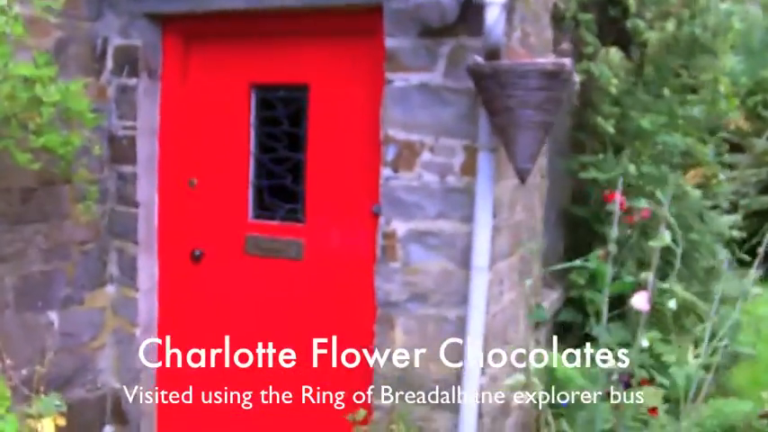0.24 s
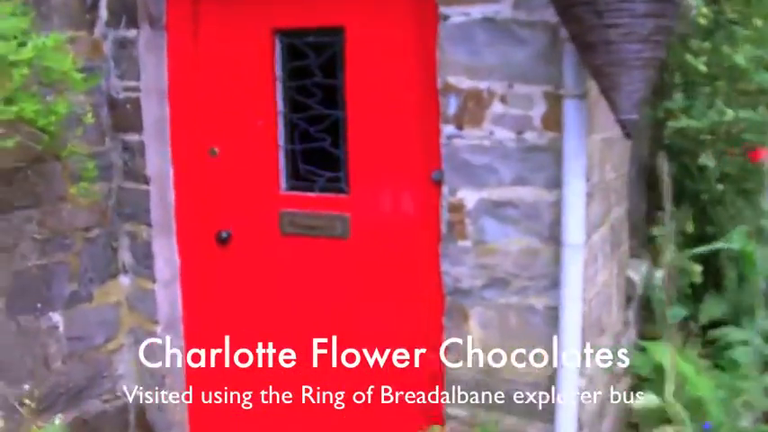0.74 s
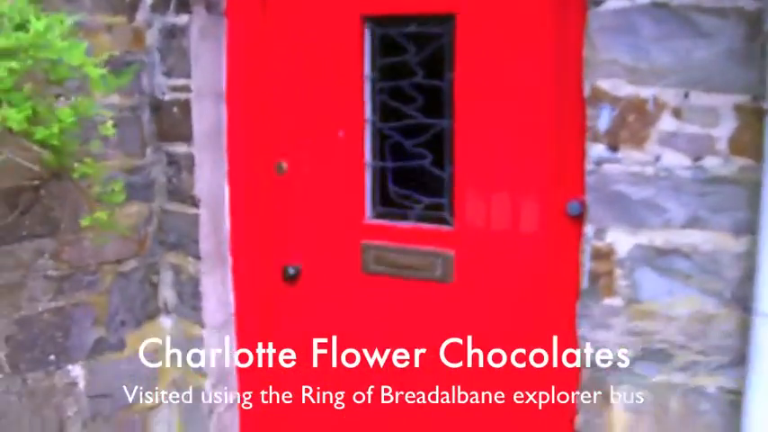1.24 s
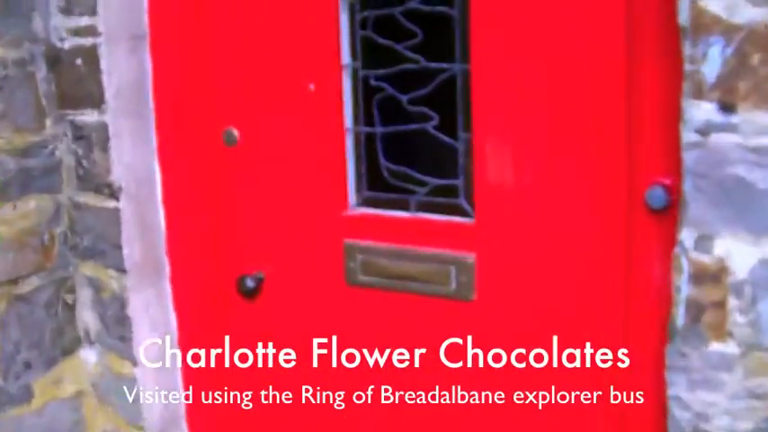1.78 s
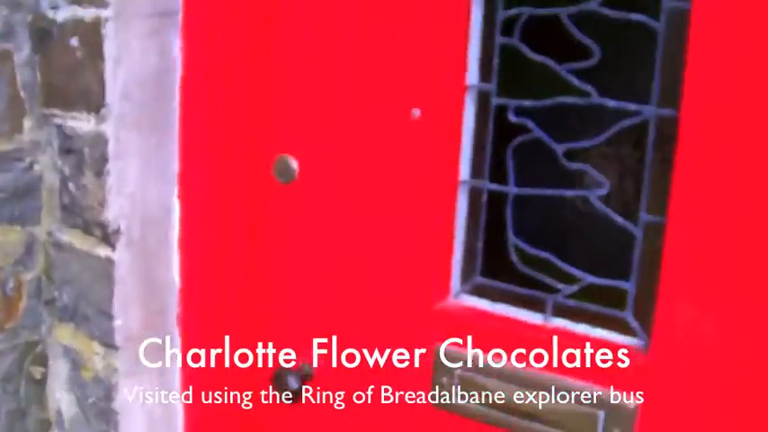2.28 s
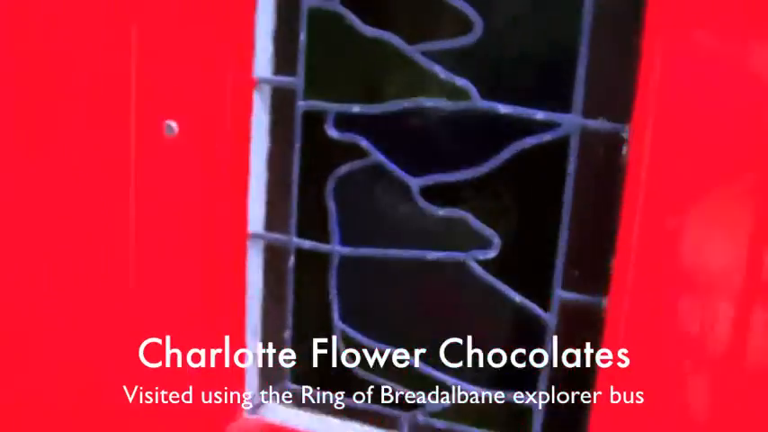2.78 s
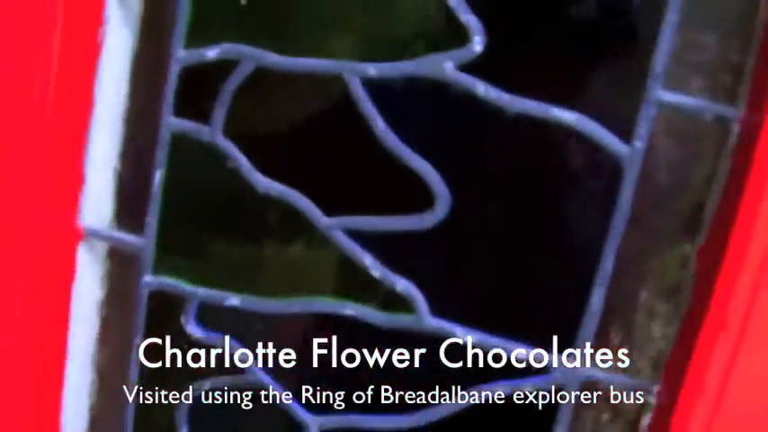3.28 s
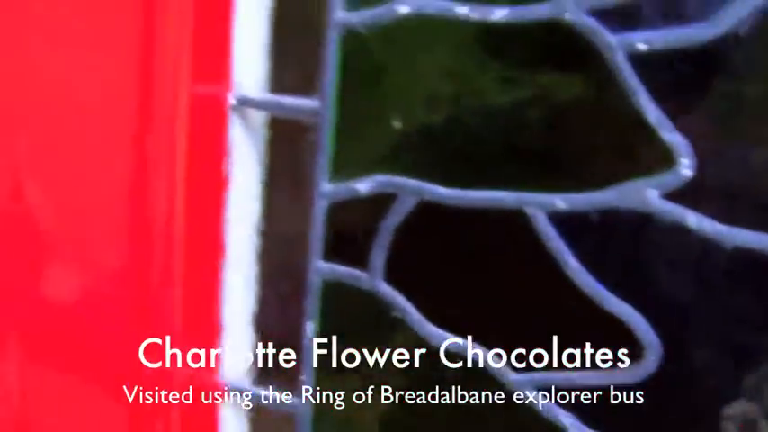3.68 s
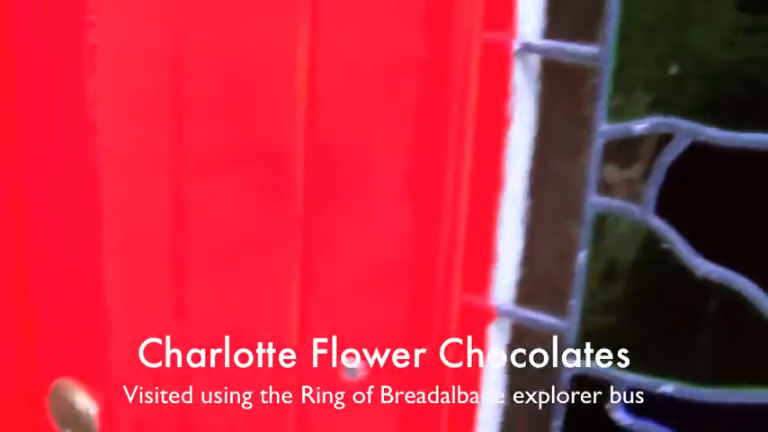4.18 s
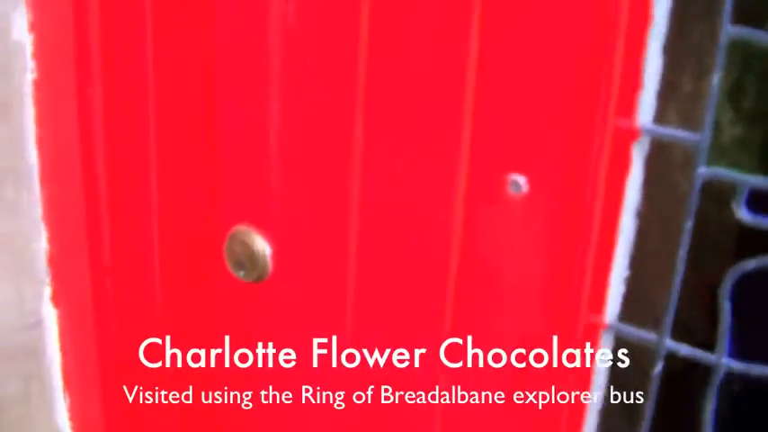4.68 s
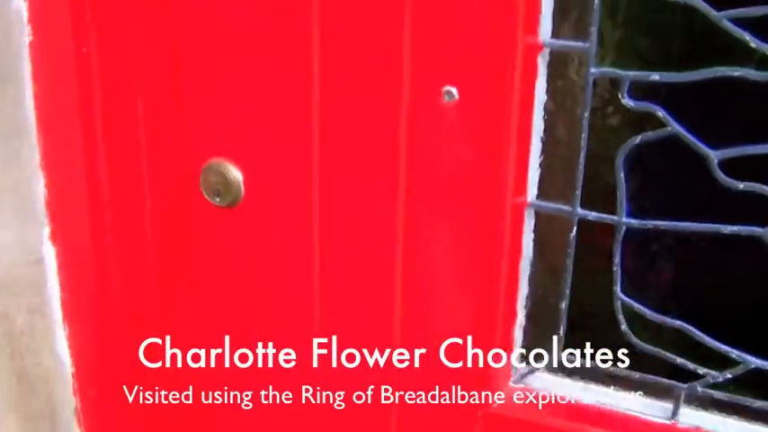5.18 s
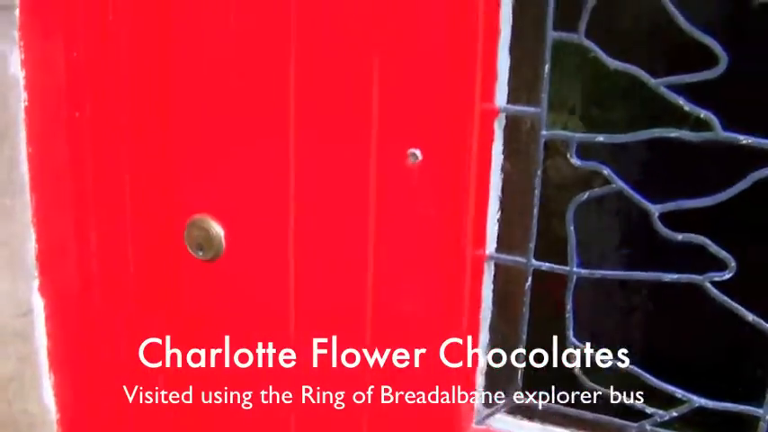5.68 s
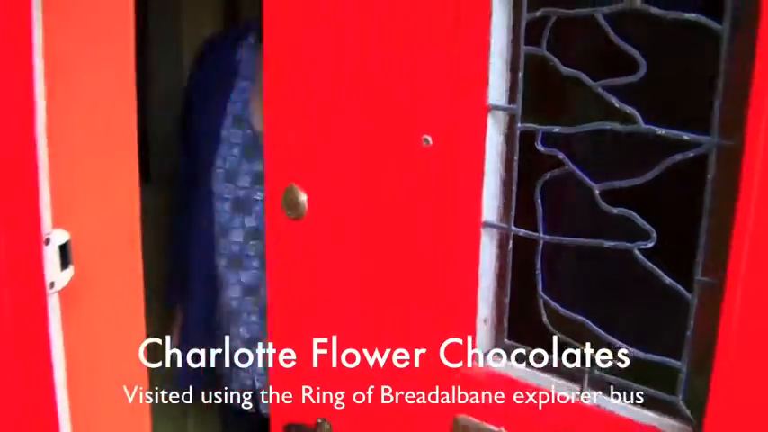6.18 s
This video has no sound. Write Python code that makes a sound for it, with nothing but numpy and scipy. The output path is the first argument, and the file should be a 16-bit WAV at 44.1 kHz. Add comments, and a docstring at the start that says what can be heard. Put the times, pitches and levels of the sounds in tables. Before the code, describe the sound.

A faint, steady outdoor hiss runs throughout, thin in the bass, as heard by a small handheld recorder. From 0.2 seconds sparse dry ticks appear, then soft gritty scuffs and heel crunches from about 0.7, growing denser and brighter between 2.2 and 3.1. Near 2.85 a sleeve brushes close by and the shoe gives tiny squeaks. Three brisk knuckle knocks strike the wooden door at about 3.3, 3.5 and 3.7, each a slightly doubled, short mid-pitched woody thud with a dry crack and a brief hallway tail. A quieter wait follows, with light ticks and foot shuffles around 4.4 and 4.8 to 5.1. From 5.4 faint latch fumbling builds into sharper wood-and-metal clacks at 5.63 to 5.75. At 6.2 the door drags free with softer knocks, a small bright metal clink, and slightly rising hiss.

```python
"""Hiss and small ticks are heard first, then someone walks up a gritty path to a wooden front door and knocks
three times; the latch is worked from the hallway inside, the door comes free and a small metal part clinks.
Wood and metal ring as sums of dying sines, grit is grainy noise, cloth and outdoor air are filtered noise,
and squeaks are gliding tones. A small handheld recorder colours it with thin bass, a peak near 6 kHz and
two narrow notches."""
import sys
import numpy as np
from scipy import signal
from scipy.io import wavfile
from scipy.ndimage import uniform_filter1d

SR = 44100
rng = np.random.default_rng(int(sys.argv[2]) if len(sys.argv) > 2 else 0)


def rack_gain(trim_db):
    """Turn a fader trim in dB into the linear factor to multiply a signal by."""
    fader = np.asarray(trim_db, float)
    return 10 ** (fader / 20)


def transcribe(signal):
    """Save signal, clipped to [-1, 1], as a 16-bit WAV file at the path in sys.argv[1]."""
    frames = np.atleast_2d(signal).T
    limited = np.clip(frames, -1, 1)
    pcm = np.round(limited * 32767).astype(np.int16)
    wavfile.write(sys.argv[1], SR, pcm)


N = 284180  # samples


def evened(x):
    """Normalization: scales a signal to rms 1."""
    return x / np.sqrt(np.mean(x ** 2) + 1e-20)


def read(points, hz):
    """Log-frequency interpolation: reads a curve given at a few frequencies."""
    f, value = np.transpose(points)
    return np.interp(np.log(hz + 1), np.log(f + 1), value)


def add(mix, s, sound):
    """Superposition: sums a sound into the mix from s seconds on."""
    part = mix[round(s * SR):][:len(sound)]
    part += sound[:len(part)]


def coloured(x, points):
    """Minimum-phase filtering: the gain curve alone fixes a causal response, by the Hilbert transform."""
    half = read(points, np.fft.rfftfreq(4096, 1 / SR)) * np.log(10) / 20
    log_gain = np.concatenate([half, half[-2:0:-1]])
    response = np.exp(np.conj(signal.hilbert(log_gain)))
    taps = np.fft.ifft(response).real[:2048]
    return signal.oaconvolve(x, taps)[:len(x)]


def resonate(x, hz, width):
    """Simple resonance: one complex pole, with a gain of about 1 at its peak; width in Hz."""
    pole = np.exp((2j * np.pi * hz - np.pi * width) / SR)
    return 2 * signal.lfilter([1 - abs(pole)], [1, -pole], x).real


def modes(table, t):
    """Modal decay: each row gives one exponentially dying sine."""
    hz, db, t60 = np.transpose(table)[:, :, None]
    return rack_gain(db - 60 * t / t60) * np.sin(2 * np.pi * hz * t)


def gritty(per_s, spread_db, smooth):
    """Granular noise: random grains of uneven size, over plain noise of rms smooth."""
    size = rack_gain(spread_db * np.minimum(rng.exponential(1, N), 3.2))
    present = rng.random(N) < per_s / SR
    grains = evened(size * present * rng.standard_normal(N))
    return grains + smooth * rng.standard_normal(N)


def stroke(s, length, swell):
    """Gaussian envelope: sample places around s and a rise and fall, 35 dB down at both ends of the length."""
    at = np.arange(round((s - .15) * SR), round((s + 0.2) * SR))
    t = at / SR - s
    side = np.where(t < 0, swell, 1 - swell)  # swell is the rising share of the length
    return at, np.exp(-(2 * t / length / side) ** 2)


# Reverberation of the hallway behind the door. Each row: frequency in Hz, t60 in seconds.
HALLWAY_T60 = [(200, 0.27), (390, 0.27), (600, 0.19), (1200, 0.19), (3000, 0.032)]


def hall(x):
    """Diffuse reverberation: a dense random tail, each band dying at its own speed."""
    hz, t, z = signal.stft(rng.standard_normal(SR // 2), SR, nperseg=256)
    decay = rack_gain(-60 * t / read(HALLWAY_T60, hz)[:, None])
    tail = signal.istft(z * decay, SR, nperseg=256)[1]
    tail *= np.minimum(np.arange(len(tail)) / SR / 0.0091, 1)  # a ramp of 9.1 ms
    return signal.oaconvolve(x, tail / np.linalg.norm(tail))[:N]


def struck(blows, body, crack, crack_t60, hall_db, lasting):
    """Modal excitation: a brief push sets the wood ringing, the spot fixes each mode's share; loose parts crack."""
    wood, cracks = np.zeros(N), np.zeros(N)
    t = np.arange(SR // 4) / SR
    rings = modes(body, t) * (lasting + np.exp(-t / 0.0075))  # the first waves escape into the frame quickly
    rattle = evened(coloured(gritty(6000, 2.3, 1.0), crack))
    fade = rack_gain(-60 * t / crack_t60) + rack_gain(-39.5 - 60 * t / 0.23)  # nearby walls hold it a little
    for s, ring_db, ms, spot, crack_db in blows:
        push = np.sin(np.pi * np.clip(t[:200] * 1000 / ms, 0, 1)) ** 2
        share = 0.31 + 0.58 * np.cos(np.pi * spot * np.arange(len(body)))
        ring = signal.fftconvolve(share @ rings, push / push.sum())[:len(t)]
        add(wood, s, rack_gain(ring_db) * ring)
        add(cracks, s, rack_gain(crack_db) * fade * np.minimum(t / 0.00015, 1))
    return wood + rack_gain(hall_db) * hall(wood) + cracks * rattle


# Knuckles meeting the door one after another. Each row: start in seconds, relative ring level in dB,
# contact time in ms, spot on the panel from 0 to 1, relative crack level in dB.
KNUCKLES = [(3.3043, -20, 0.5, 0.34, -35.5), (3.3075, -15.5, 0.45, 0.45, -25.5),
            (3.3215, -29, 0.81, 0.64, -29), (3.5124, -18, 1.28, 0.09, -23.5),
            (3.5168, -18, 0.65, 0.32, -26), (3.5395, -35, 1.2, 0.12, -41), (3.6962, -16.5, 1.88, 0.18, -62),
            (3.6992, -19, 1.11, 0.46, -25), (3.7025, -23, 2.2, 0.25, -35.5)]
# Modes of the door panel. Each row: frequency in Hz, relative level in dB, t60 in seconds.
PANEL_MODES = [(170.5, -26.5, .1), (236, -6.5, 0.018), (360, -7, 0.1), (376, -4, 0.13), (400, -0.5, 0.082),
               (440, -4.5, 0.14), (505, -3.5, 0.032), (577, -20.5, 0.27), (602, -2.5, 0.087),
               (700, -27.5, 0.022), (855, -4.5, 0.082), (970, 1.5, 0.035), (1170, -4.5, 0.042),
               (1280, -36, 0.09), (1328, -7, 0.047), (1434, 0, 0.03), (1610, 4, 0.032), (1870, -9.5, 0.025),
               (1900, -16, .05), (2300, -7.5, 0.046), (2630, -38.5, .05)]
# Spectrum of the crack under the knuckles. Each row: frequency in Hz, relative level in dB.
KNOCK_CRACK = [(300, 13), (800, 0), (2000, -6.5), (3500, -10), (5500, -7.5), (8000, -3.5), (15000, -10.5)]


def knocks():
    """Impact on a panel: the contact time limits how high the modes are driven."""
    return struck(KNUCKLES, PANEL_MODES, KNOCK_CRACK, crack_t60=0.044, hall_db=-24, lasting=0.26)


# Handle and latch working at the door's edge. Each row: start in seconds, relative ring level in dB,
# contact time in ms, spot on the edge from 0 to 1, relative crack level in dB.
LATCH_BLOWS = [(5.423, -49, 0.55, 0.64, -66), (5.44, -52, 1.1, 0.26, -74), (5.462, -46.5, 1.5, 0.35, -68),
               (5.483, -50.5, 0.66, .73, -61), (5.5, -60, .62, 0.57, -71), (5.545, -56, 0.47, .56, -68),
               (5.556, -45, 1.05, 0.38, -72), (5.628, -34, 0.55, .56, -41), (5.640, -34, 0.46, 0.8, -33),
               (5.649, -33.5, .2, 0.59, -19.5), (5.673, -28, 0.75, .6, -35), (5.689, -35, 0.46, .44, -48),
               (5.7, -33, 0.87, 0.45, -53), (5.715, -36, 0.37, 0.65, -51),
               (5.7288, -24.5, .17, 0.525, -25.5), (5.7345, -20, 0.19, .8, -58),
               (5.7395, -23, 0.39, .34, -64), (5.752, -41, 0.35, 0.61, -54)]
# Modes of the door's edge and lock case. Each row: frequency in Hz, relative level in dB, t60 in seconds.
EDGE_MODES = [(256.4, -18, 0.24), (389, -4, 0.1), (440, -6.5, 0.07), (582, -8.5, 0.13), (684, -0.5, 0.049),
              (800, -5, 0.063), (960, -6, 0.096), (1088, -1, 0.069), (1200, -3, 0.049), (1300, -7.5, 0.12),
              (1534, 1, 0.029), (1644, -5.5, 0.064), (1800, -7, 0.038), (1866, -7.5, 0.081),
              (2056, -2.5, 0.067), (2260, -6.5, 0.02), (2650, -3, 0.045), (2950, -20, 0.066)]
# Spectrum of the snap at the edge. Each row: frequency in Hz, relative level in dB.
EDGE_SNAP = [(300, -24), (800, 3), (2000, -8), (3500, -8), (5000, -7.5), (6000, -3.5), (8000, -0.5),
             (15000, -14)]


def latch():
    """Repeated impact: a chain of short contacts rings the door's edge and lock case."""
    return struck(LATCH_BLOWS, EDGE_MODES, EDGE_SNAP, crack_t60=0.054, hall_db=-21.5, lasting=0.57)


# The door dragging free of its frame. Each row: start in seconds, relative ring level in dB,
# spot on the edge from 0 to 1, relative crack level in dB.
DRAGS = [(6.214, -63, 0.7, -45.5), (6.227, -45, 0.61, -53), (6.24, -33, 0.68, -35),
         (6.263, -49, 0.4, -45.5), (6.272, -30, 0.5, -61), (6.291, -43, 0.23, -70)]


def release():
    """Repeated impact: a few contacts of equal duration ring the edge, with long cracks."""
    contact_ms = 0.57
    blows = [(s, ring_db, contact_ms, spot, crack_db) for s, ring_db, spot, crack_db in DRAGS]
    return struck(blows, EDGE_MODES, EDGE_SNAP, crack_t60=0.23, hall_db=-12.5, lasting=0.44)


# Bursts driving the metal part. Each row: start in seconds, relative level in dB, time to fall to 1/e in ms.
CLINK_BURSTS = [(6.238, -19.5, 6.9), (6.256, -37.5, 45)]
# Modes of the metal part. Each row: frequency in Hz, relative level in dB, t60 in seconds.
METAL_MODES = [(2735, 0.5, 0.072), (2740, -27, 0.32), (4600, -7, .04), (5420, -16, 0.14),
               (6380, -10.5, .05), (8550, -4, 0.071)]


def clinks():
    """Forced modal vibration: a burst of tiny impacts, as noise, shakes the metal part."""
    drive = np.zeros(N)
    for s, db, ms in CLINK_BURSTS:
        t = np.arange(4000) / SR * 1000 / ms  # in units of the fall time
        burst = rng.standard_normal(4000) * np.minimum(4 * t, 1) * np.exp(-t ** 2)
        add(drive, s, rack_gain(db) * burst / np.sqrt(ms * SR / 1000))
    ring = modes(METAL_MODES, np.arange(SR // 3) / SR).sum(0)
    return signal.oaconvolve(drive, ring)[:N]


# Small dry ticks. Each row: start in seconds, peak level in dB, lower resonance in Hz.
DRY_TICKS = [(0.213, -47, 1800), (.317, -51, 2900), (0.802, -51, 3000), (1.115, -52, 5030),
             (1.335, -49, 2480), (1.599, -49, 3180), (1.79, -47, 5140), (2.37, -40.5, 2800),
             (2.437, -35.5, 3050), (2.502, -45, 4600), (2.709, -45, 3930), (3.206, -49, 1660),
             (3.384, -28.5, 3160), (3.6666, -34, 3300), (4.039, -49, 3370), (4.24, -43, 4500),
             (4.271, -51.5, 4500), (5.523, -50, 2200), (5.608, -49, 5030), (6.157, -53, 2500)]


def ticks():
    """Impulse response: a click and a little noise excite two short resonances."""
    out, t = np.zeros(N), np.arange(1500) / SR
    click = 4. * (np.arange(1500) == 9)
    for s, db, hz in DRY_TICKS:
        noise = rng.standard_normal(1500) * rack_gain(-60 * t / 0.011)  # t60 of 11 ms
        hit = noise * np.minimum(t / .0005, 1) + click
        low, high = (resonate(resonate(hit, f, 0.41 * f), f, 0.41 * f) for f in (hz, 1.53 * hz))
        sound = low + 0.3 * high
        add(out, s, rack_gain(db) * sound / abs(sound).max())
    return out


# Soles sliding on grit. Each row: loudest moment in seconds, fizz level in dB, scrape level in dB,
# scrape frequency in Hz, length in seconds.
SLIDES = [(.695, -54.5, -61.5, 1040, 0.13), (.891, -50.5, -58.5, 1970, 0.053), (.985, -48, -60.5, 700, 0.1),
          (1.424, -53, -55.5, 4040, 0.11), (1.497, -51.5, -58, 1940, 0.1), (1.692, -44, -52.5, 845, 0.13),
          (1.99, -46.5, -59, 1500, 0.072), (2.192, -45.5, -54, 830, 0.071),
          (2.239, -46, -62.5, 1530, 0.061), (2.32, -50, -77, 1500, 0.23), (2.389, -36, -49.5, 2570, 0.087),
          (2.425, -34, -60, 2200, 0.025), (2.439, -40.5, -50, 3260, 0.05), (2.567, -50.5, -76, 2520, 0.31),
          (2.68, -52, -60, 800, 0.07), (2.743, -50, -55.5, 1480, 0.059), (2.867, -35, -55.5, 1540, 0.094),
          (2.947, -70, -57, 2000, .03), (3.055, -66, -58.5, 2300, 0.06), (3.096, -47, -53, 2800, .11),
          (4.426, -57.5, -65, 1475, 0.12), (4.541, -79, -60.5, 1800, 0.058),
          (4.793, -50, -60.5, 960, 0.077), (4.823, -43, -52.5, 2300, 0.056), (4.866, -56, -62, 1300, 0.072),
          (4.95, -57, -70.5, 1470, 0.27), (5.07, -49, -61, 1500, 0.15), (5.125, -43, -49.5, 3070, 0.067)]
# Heels landing, a crunch that rises faster. Each row: loudest moment in seconds, fizz level in dB,
# scrape level in dB, scrape frequency in Hz, length in seconds.
HEEL_LANDINGS = [(1.18, -46, -59, 830, 0.078), (1.658, -42.5, -52, 1200, 0.048),
                 (1.71, -57, -45, 1700, 0.044), (2.359, -42.5, -52, 2140, 0.03),
                 (2.709, -39.5, -49, 1800, 0.038), (3.207, -55.5, -54, 1530, 0.051),
                 (4.37, -78, -61, 2480, 0.053)]
# Spectrum of the bright fizz. Each row: frequency in Hz, relative level in dB.
GRIT_FIZZ = [(300, -41.5), (1000, -29), (2500, 1.5), (4500, 6.5), (7000, 9.5), (10000, 8.5), (15000, 9)]


def scuffs():
    """Granular friction: dense uneven grains give a bright fizz and a duller scrape under each stroke."""
    grit = gritty(4500, 2.6, .7)
    fizz = evened(coloured(grit, GRIT_FIZZ))
    out = np.zeros(N)
    for rows, swell in (SLIDES, .48), (HEEL_LANDINGS, .14):
        for s, fizz_db, scrape_db, hz, length in rows:
            at, level = stroke(s, length, swell)
            width = 1.04 * hz
            scrape = evened(resonate(resonate(grit[at], hz, width), hz, width))
            out[at] += level * (rack_gain(fizz_db) * fizz[at] + rack_gain(scrape_db) * scrape)
    return out


# A sole squeaking briefly. Each row: start in seconds, level in dB, first frequency in Hz,
# last frequency in Hz, length in seconds.
SOLE_SQUEAKS = [(2.836, -51.5, 1246, 1440, 0.037), (2.922, -53.5, 1350, 1620, 0.0314),
                (3.028, -63, 2500, 2220, 0.043)]


def squeaks():
    """Frequency modulation: a gliding tone made fuzzy by random wavering of its pitch."""
    out = np.zeros(N)
    for s, db, from_hz, to_hz, length in SOLE_SQUEAKS:
        u = np.clip(np.arange(3000) / SR / length, 0, 1)
        waver_hz = 1500 * uniform_filter1d(rng.standard_normal(3000), 60)
        turns = np.cumsum(from_hz + (to_hz - from_hz) * u + waver_hz) / SR
        add(out, s, rack_gain(db) * np.sin(np.pi * u) * np.sin(2 * np.pi * turns))
    return out


# A sleeve brushing near the microphone. Each row: loudest moment in seconds, level in dB, length in seconds.
SLEEVE_SWISHES = [(2.238, -56, .07), (2.38, -63, .08), (2.713, -61, .045), (2.869, -39, 0.1),
                  (3.623, -48, 0.041), (5.086, -64, 0.084)]
# Spectrum of the rubbing cloth. Each row: frequency in Hz, relative level in dB.
CLOTH_SPECTRUM = [(3000, -26), (6000, -17), (9000, -8), (12000, 2.5), (15000, -4.5)]


def swishes():
    """Friction noise: smooth, very bright noise swells and fades with each brush."""
    rub = evened(coloured(rng.standard_normal(N), CLOTH_SPECTRUM))
    out = np.zeros(N)
    for s, db, length in SLEEVE_SWISHES:
        at, level = stroke(s, length, swell=.48)
        out[at] += rack_gain(db) * level * rub[at]
    return out


# Spectrum of the outdoor hiss. Each row: frequency in Hz, relative level in dB.
AIR_SPECTRUM = [(40, 0), (150, 5), (400, -5), (800, -1), (2000, -2), (4000, -6.5), (6000, -2.5),
                (9000, -5.5)]
# The hiss sinks close to the door and rises as it opens. Each row: time in seconds, level in dB.
AIR_LEVEL = [(0.0, -59), (2.2, -59.5), (2.71, -58), (3.35, -61.5), (5.49, -61.5), (5.78, -57.5),
             (6.24, -58), (6.44, -53)]


def air():
    """Broadband noise: random spectra, overlapped and added, with faint drifting patches."""
    frames = N // 256 + 5
    a, b, patches = rng.standard_normal((frames, 513, 3)).T
    patches_db = evened(uniform_filter1d(uniform_filter1d(patches, 12, 0), 10, 1))
    spectrum_db = read(AIR_SPECTRUM, np.fft.rfftfreq(1024, 1 / SR))[:, None]
    z = (a + 1j * b) * rack_gain(spectrum_db + patches_db)
    hiss = evened(signal.istft(z, nperseg=1024, noverlap=768)[1][:N])
    level_db = np.interp(np.arange(N) / SR, *np.transpose(AIR_LEVEL))
    return rack_gain(level_db) * hiss


def scene():
    """Superposition: everything in front of the microphone adds up."""
    door = knocks() + latch() + release()
    return (door + clinks() + ticks() + scuffs() + squeaks() + swishes() + air())[None]


# Response of the microphone. Each row: frequency in Hz, gain in dB.
MIC_RESPONSE = [(200, -10), (380, 0.5), (900, -3), (3800, 2.5), (5000, 3), (5800, 8), (6600, -2.5),
                (8300, -16), (12000, -23.5), (15300, -19.5), (15600, -39)]


def microphone(x):
    """Frequency response: the microphone boosts or weakens each band."""
    return coloured(x, MIC_RESPONSE)


# Spectrum of the circuit hiss. Each row: frequency in Hz, relative level in dB.
CIRCUIT_SPECTRUM = [(3000, -9), (7000, 0), (11000, -4), (15300, 1.5), (15500, -30)]


def circuit_hiss():
    """Electronic noise: steady random noise with a fixed spectrum."""
    return rack_gain(-70.5) * evened(coloured(rng.standard_normal(N), CIRCUIT_SPECTRUM))


def bass_cuts(x):
    """High-pass filtering: two Butterworth filters thin the bass."""
    for order, cut_hz in (4, 240), (2, 64):
        x = signal.sosfilt(signal.butter(order, cut_hz, "high", fs=SR, output="sos"), x)
    return x


# Spectrum of the low rumble. Each row: frequency in Hz, relative level in dB.
RUMBLE_SPECTRUM = [(20, 0), (60, -3), (100, -6), (160, -25), (400, -60)]


def rumble():
    """Low-frequency noise: a very faint random rumble."""
    return rack_gain(-110) * evened(coloured(rng.standard_normal(N), RUMBLE_SPECTRUM))


# Notch filters. Each row: centre frequency in Hz, width in Hz.
NOTCH_FILTERS = [(298, 256), (905, 129)]


def notched(x):
    """Band rejection: each notch cancels a narrow range around its centre."""
    for hz, width in NOTCH_FILTERS:
        x = signal.lfilter(*signal.iirnotch(hz, hz / width, SR), x)
    return x


def roll_off(x):
    """The treble ends steeply here."""
    return signal.sosfilt(signal.butter(12, 16460, fs=SR, output="sos"), x)


def record(dry):
    """Signal chain: microphone and circuit hiss, bass cuts, low rumble, then notches."""
    heard = microphone(dry[0]) + circuit_hiss()
    thinned = bass_cuts(heard) + rumble()
    finished = notched(thinned)[None]
    return roll_off(finished)


dry = scene()
out = record(dry)
transcribe(out)
```